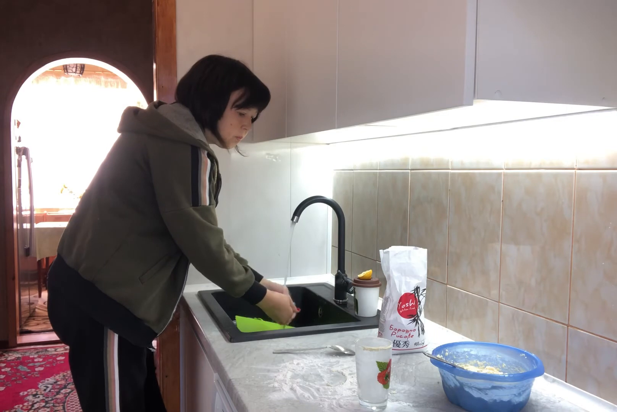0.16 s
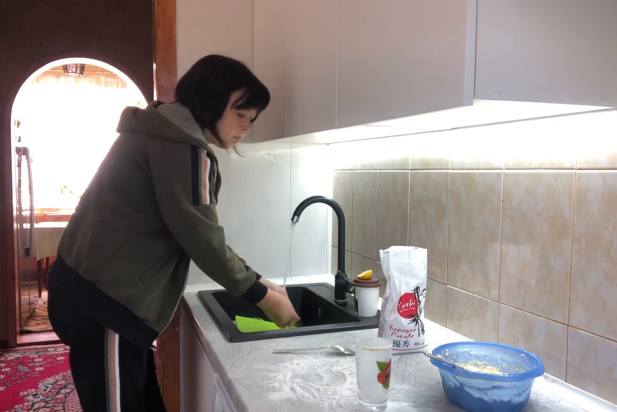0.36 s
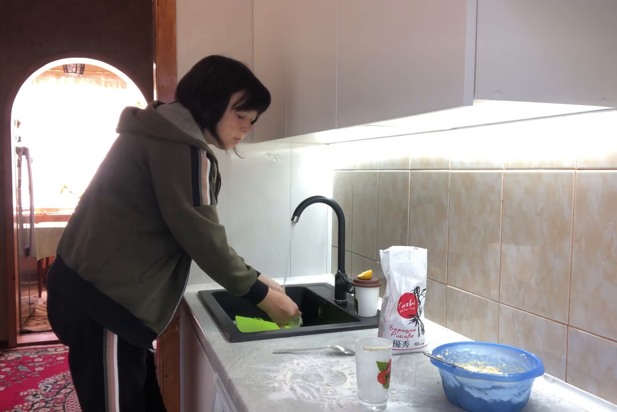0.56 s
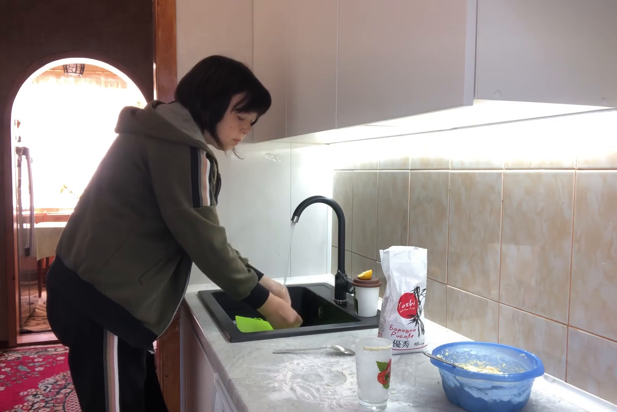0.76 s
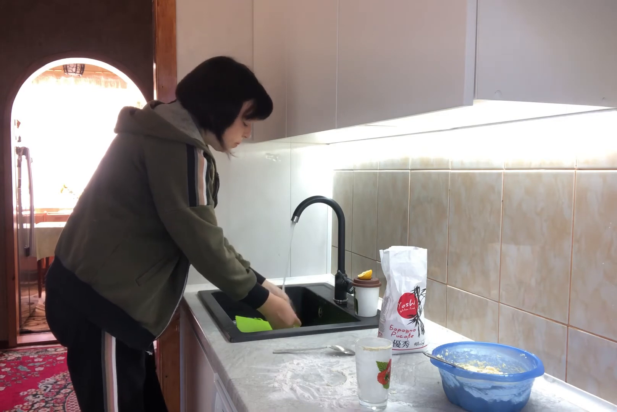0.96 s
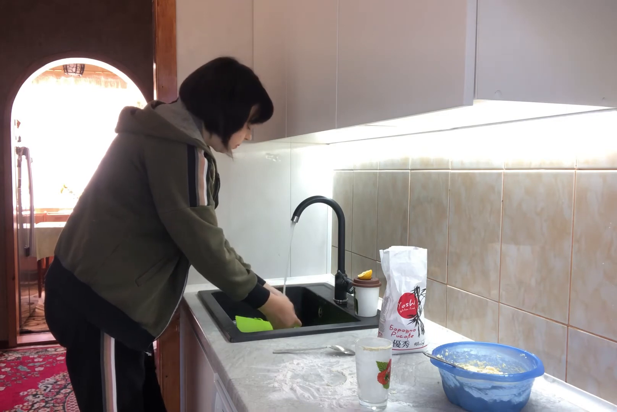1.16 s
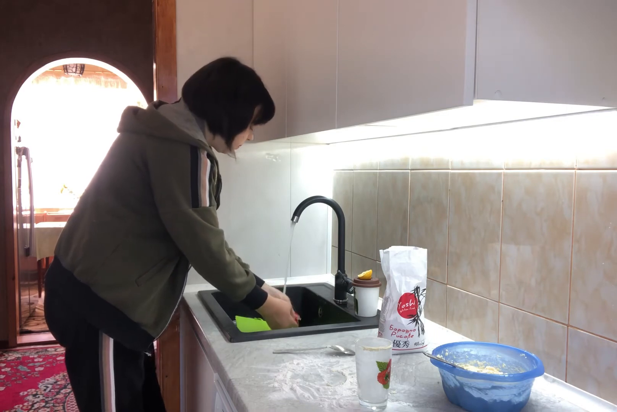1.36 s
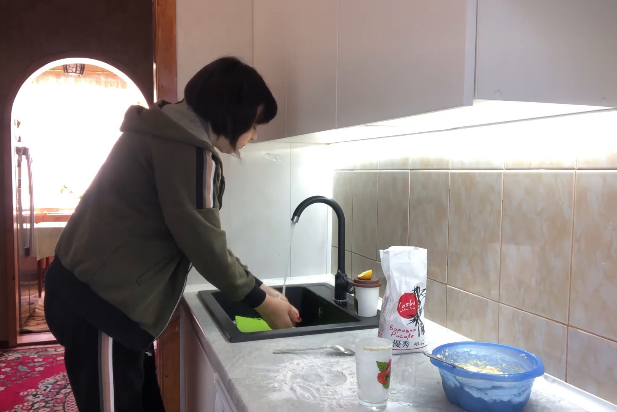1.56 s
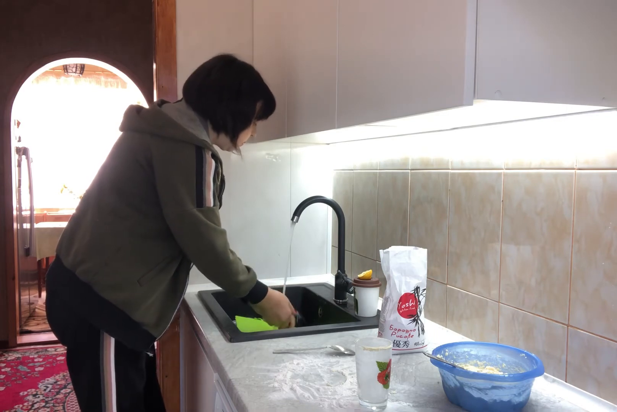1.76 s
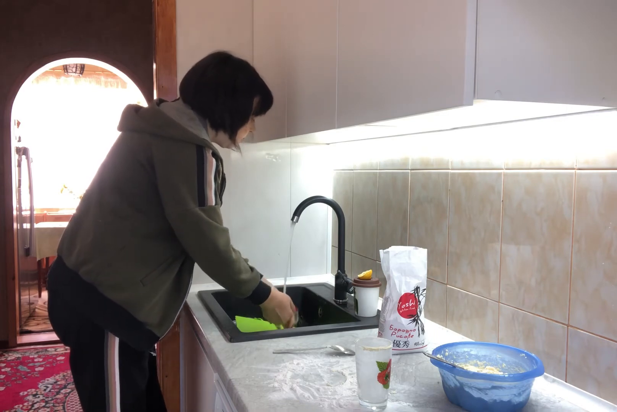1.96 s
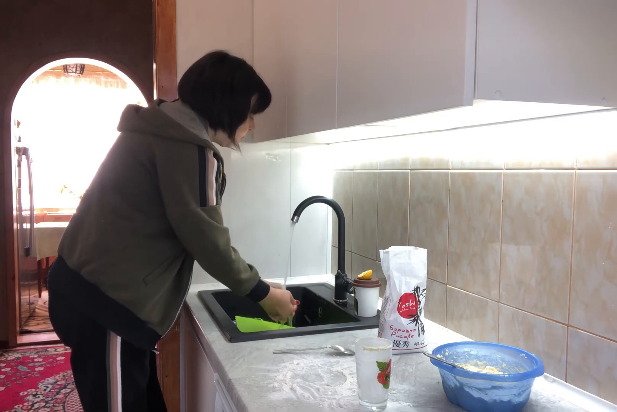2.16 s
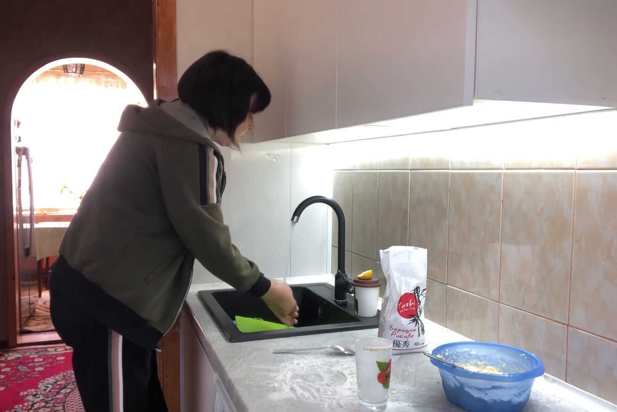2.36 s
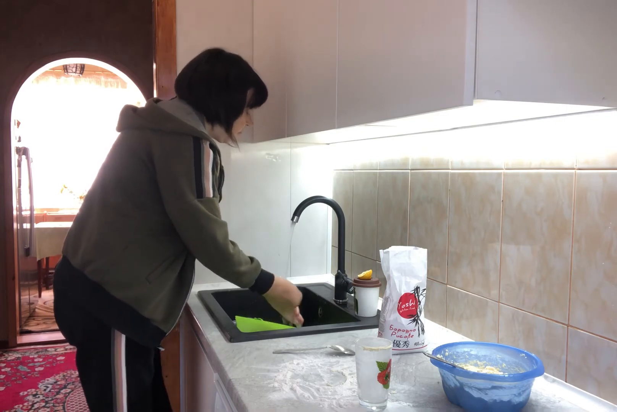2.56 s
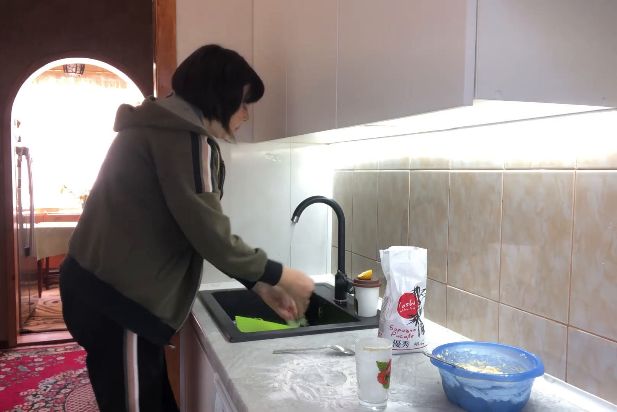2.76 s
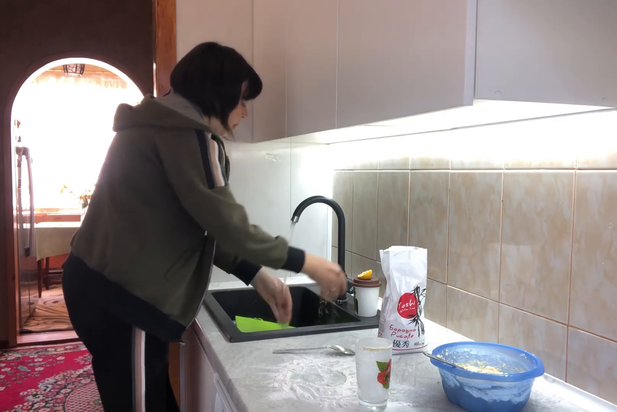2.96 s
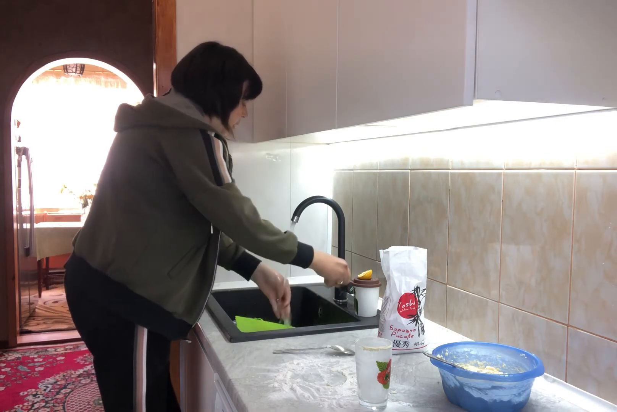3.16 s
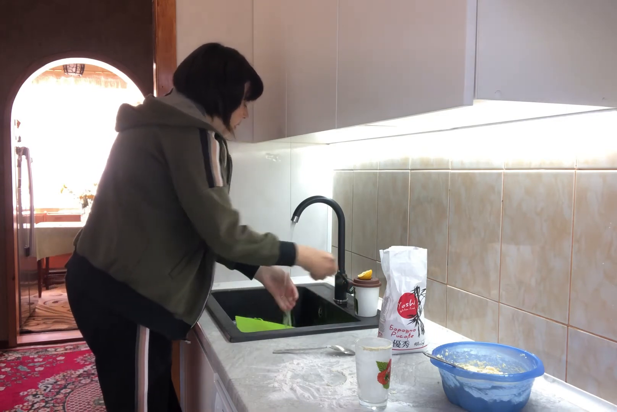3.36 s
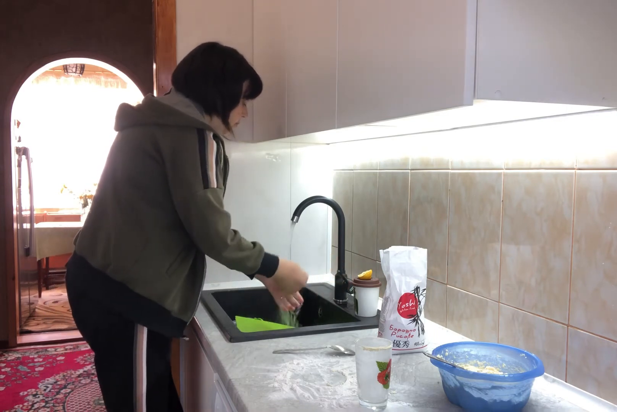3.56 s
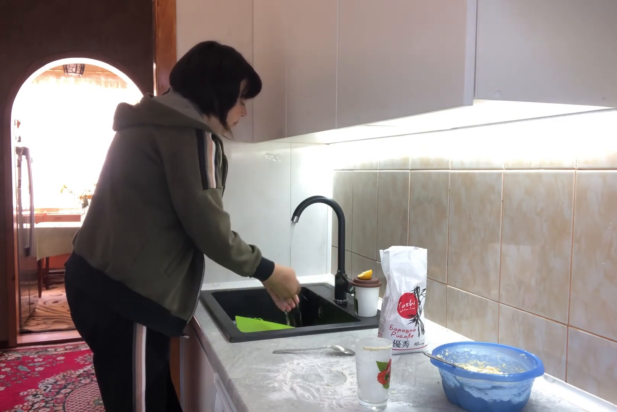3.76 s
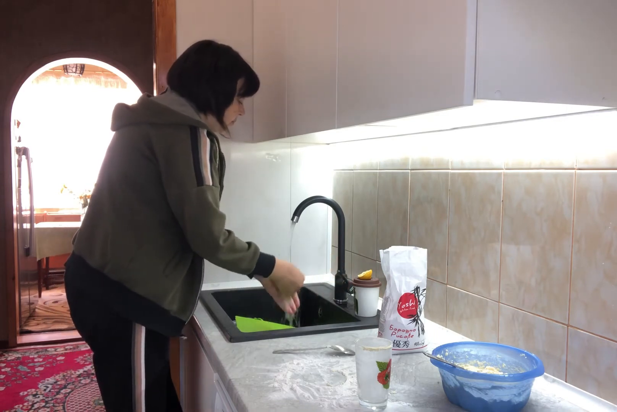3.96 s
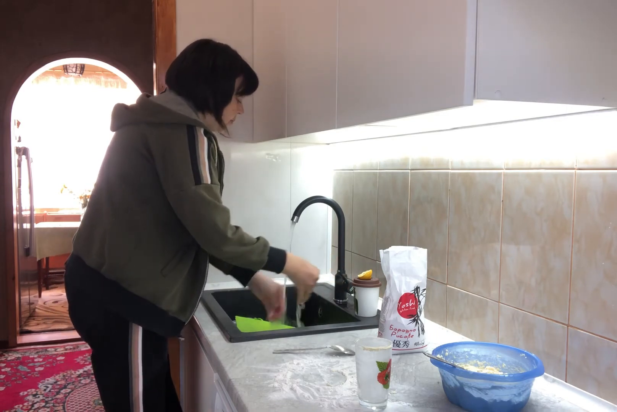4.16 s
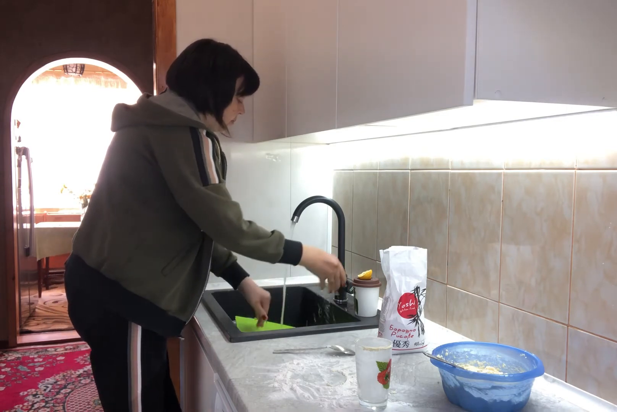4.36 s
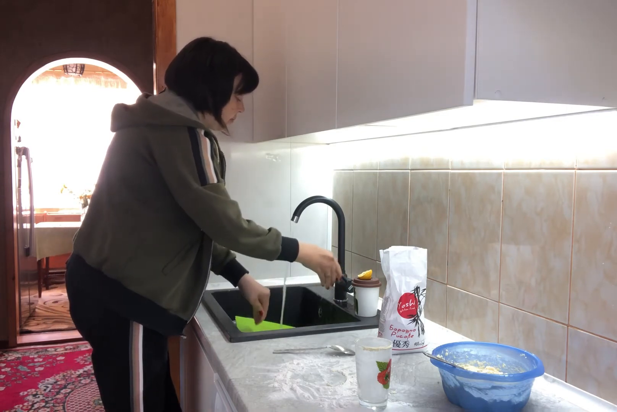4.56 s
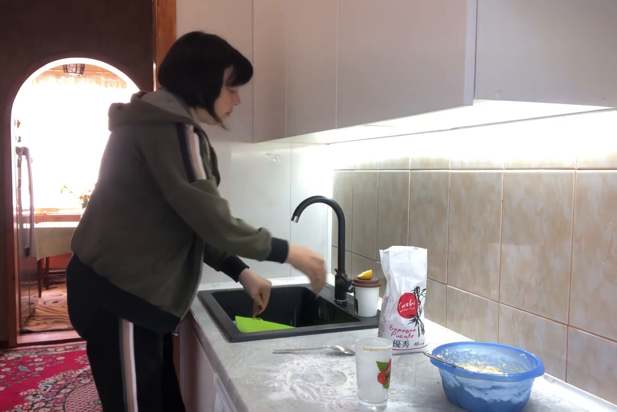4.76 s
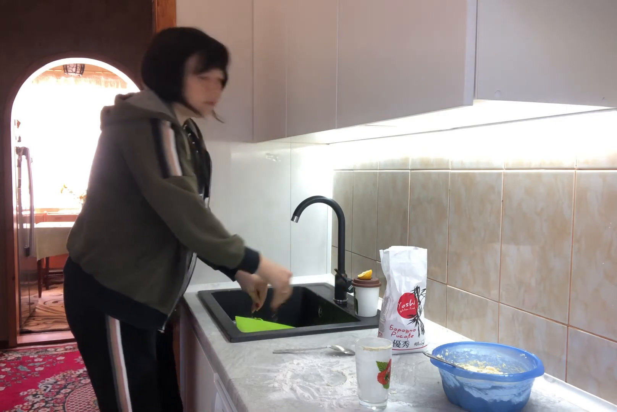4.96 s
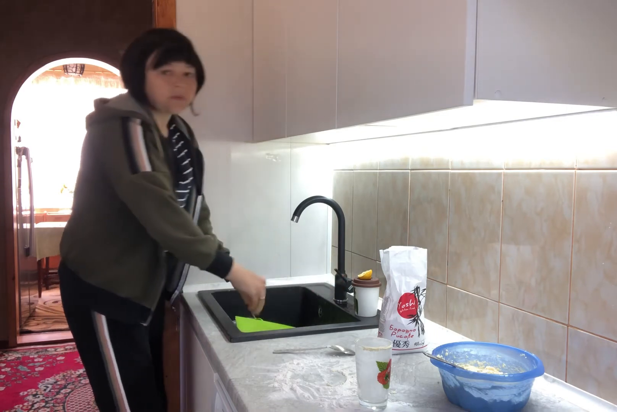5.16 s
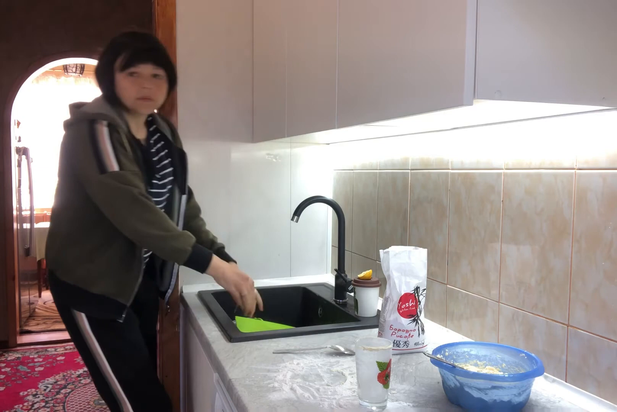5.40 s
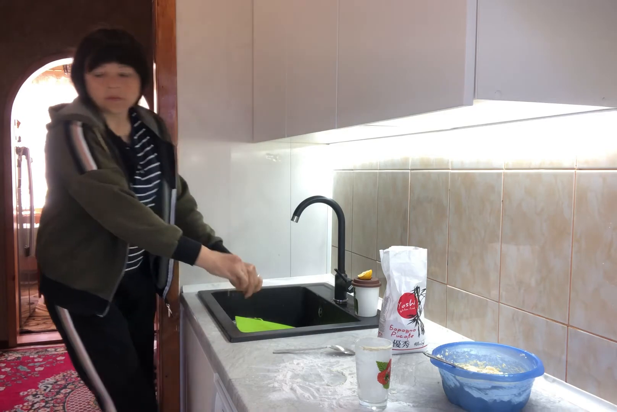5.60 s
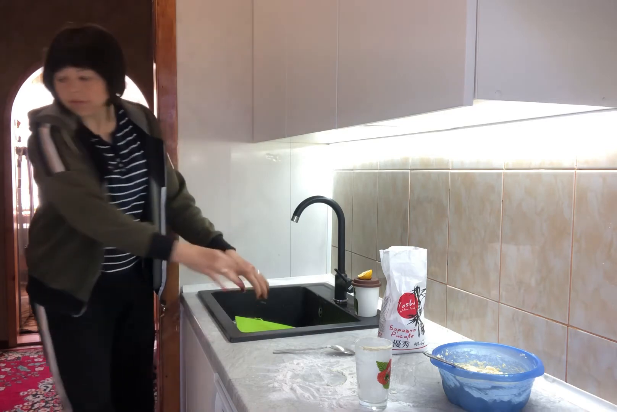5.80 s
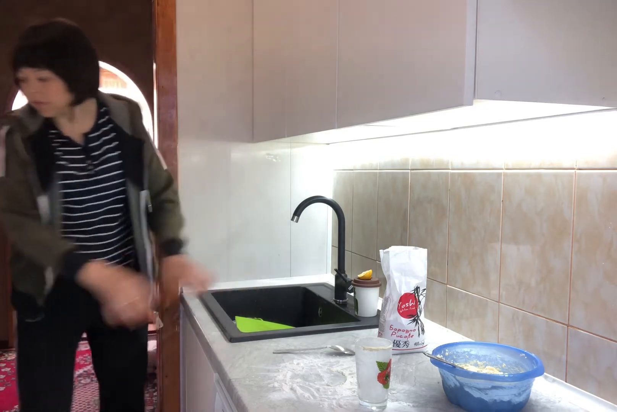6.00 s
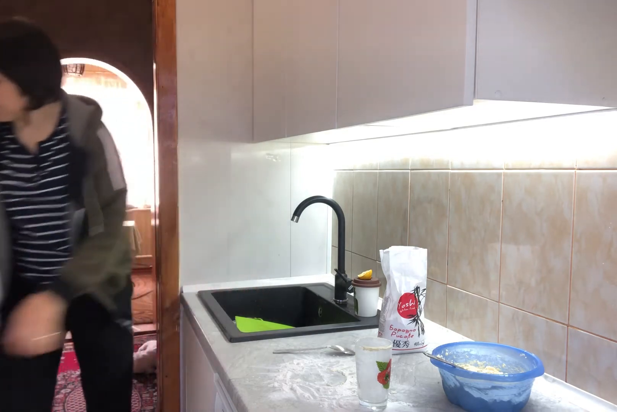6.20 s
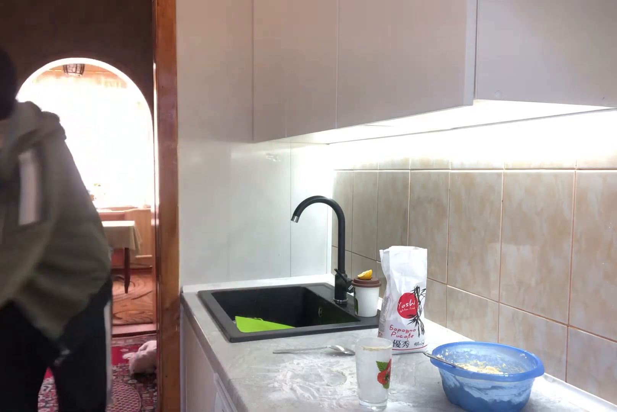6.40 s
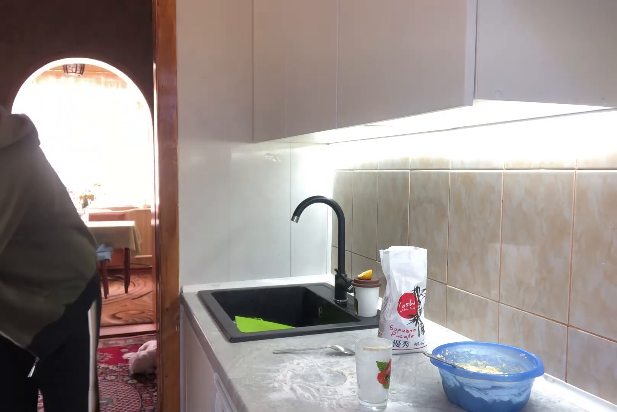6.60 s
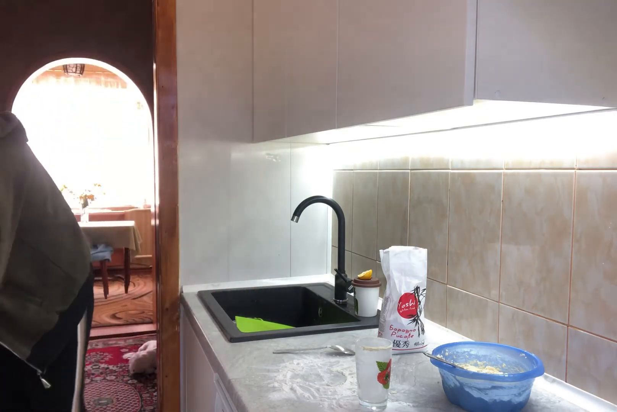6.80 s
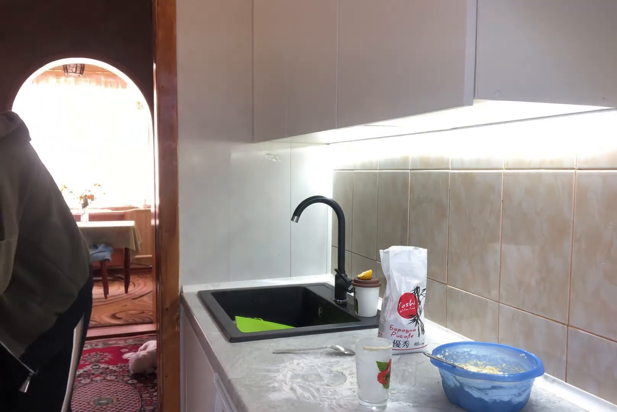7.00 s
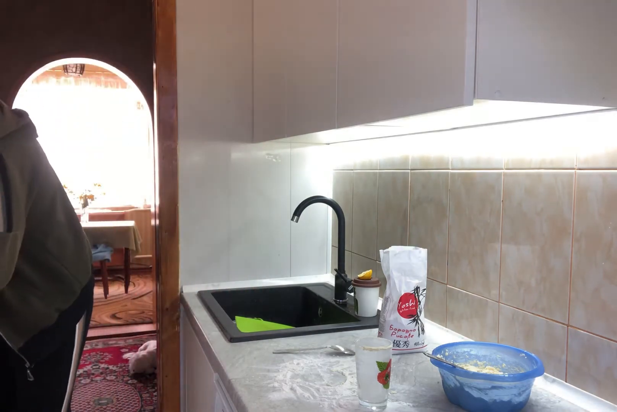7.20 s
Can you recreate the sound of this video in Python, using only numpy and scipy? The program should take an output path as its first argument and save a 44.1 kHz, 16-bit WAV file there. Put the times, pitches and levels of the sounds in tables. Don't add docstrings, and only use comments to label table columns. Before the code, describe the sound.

Hands rinse under a running tap, bright splashing and plopping; after the valve closes, small ticks, cloth rustle and soft thuds over quiet mains hum.

```python
import sys
import numpy as np
from scipy import signal
from scipy.fft import rfft, irfft
from scipy.io import wavfile
from scipy.ndimage import uniform_filter1d

SR = 44100
rng = np.random.default_rng(int(sys.argv[2]) if len(sys.argv) > 2 else 0)


def elevation(decibels):
    levels = np.asarray(decibels, float)
    return 10 ** (levels / 20)


def bounce(signal):
    frames = np.transpose(np.atleast_2d(signal))
    limited = np.clip(frames, -1, 1)
    pcm = np.round(limited * 32767).astype(np.int16)
    wavfile.write(sys.argv[1], SR, pcm)


N = 319284
TIME_S = np.arange(N) / SR


def evened(x):
    return x / np.sqrt(np.mean(x ** 2) + 1e-20)


def read(points, hz):
    f, value = np.transpose(points)
    return np.interp(np.log(hz + 1), np.log(f + 1), value)


def curves(rows):
    s, *columns = np.transpose(rows)
    return [np.interp(TIME_S, s, column) for column in columns]


def add(mix, s, sound):
    part = mix[round(s * SR):][:len(sound)]
    part += sound[:len(part)]


def swell(s, db, fade_s, rise_s=None):
    late_s = TIME_S - s
    rise_s = rise_s or 0.5 * fade_s
    return elevation(db - 20 * np.maximum(late_s / fade_s, -late_s / rise_s))


def held(s, end_s, edge_s):
    return np.clip(np.minimum(TIME_S - s, end_s - TIME_S) / edge_s + 0.5, 0, 1)


def dips(rows):
    shares = [share * held(s - length_s / 2, s + length_s / 2, length_s / 2) for s, length_s, share in rows]
    return np.clip(sum(shares), 0, 1)


def fall_db(s, db_per_s):
    return -db_per_s * np.maximum(TIME_S - s, 0)


def wander(size):
    return evened(uniform_filter1d(rng.standard_normal(N), size=size))


def coloured(x, points):
    hz = np.fft.rfftfreq(len(x), 1 / SR)
    return evened(irfft(rfft(x) * elevation(read(points, hz)), len(x)))


def hiss(points, patchy_db, flicker_db, size=256):
    frames, hz = 4 * N // size + 8, np.fft.rfftfreq(size, 1 / SR)
    a, b, patches = rng.standard_normal((frames, len(hz), 3)).T
    patches = uniform_filter1d(patches, size=3, axis=0)
    patches = evened(uniform_filter1d(patches, size=30, axis=1))
    flicker = evened(uniform_filter1d(rng.standard_normal(frames), size=12))
    level_db = read(points, hz)[:, None] + patchy_db * patches + flicker_db * flicker
    z = (a + 1j * b) * elevation(level_db)
    return evened(signal.istft(z, nperseg=size, noverlap=3 * size // 4)[1][:N])


def bubble(hz, t60_s, rise):
    t = np.arange(int(t60_s * SR) + 8) / SR
    ring = np.sin(2 * np.pi * hz * (t + rise * t ** 2 / t60_s))
    return ring * elevation(-60 * t / t60_s) * (1 - np.exp(-t / 0.0011))


def fizz(points, per_s, cycles, spread_db, count=24):
    out = np.zeros(N)
    for hz in np.geomspace(points[0][0], points[-1][0], count):
        size = 1. * (rng.random(N) < per_s / count / SR)
        strengths = elevation(spread_db * np.minimum(rng.exponential(1, N // count), 4))
        size[size > 0] = strengths[:int(size.sum())]
        grain = bubble(hz * rng.uniform(0.921, 1.03), cycles / hz, rise=0.17)
        out += signal.oaconvolve(size, grain * elevation(read(points, hz)) * hz)[:N]
    return evened(out)


def whistle(hz, width_hz, db, steady=0):
    r = np.exp(-np.pi * width_hz / SR)
    slow = rng.standard_normal(N) + 1j * rng.standard_normal(N)
    slow = signal.lfilter([1 - r], [1, -r], slow)
    slow = signal.lfilter([1 - r ** 3], [1, -r ** 3], slow)
    slow = slow / (abs(slow) + 1e-9) ** steady
    return elevation(db) * evened((slow * np.exp(2j * np.pi * hz * TIME_S)).real)


# time in seconds, strike in dB, spray relative to it in dB.
JET_FORCE = [(0, -42.5, -5.5), (.15, -43, -4), (.45, -45.5, -6.5), (.9, -45, -4), (1.45, -42.5, -5.5),
             (1.6, -43, -4.5), (1.95, -42.5, -3.5), (2.1, -43, -7.5), (2.8, -45, -4.5), (3.1, -44.5, -8.5),
             (3.45, -45, -6), (3.6, -41.5, -5), (3.8, -50, -0.5), (3.97, -43, -6.5), (4.13, -46.5, -7.5),
             (4.23, -43, -1), (4.49, -41.5, -0.5), (4.75, -45, 2.5)]


def strike():
    return elevation(curves(JET_FORCE)[0] + fall_db(JET_FORCE[-1][0], 228))


# centre in seconds, length in seconds, share muted 0-1.
HOLLOWS = [
    (.33, .06, .5),
    (.87, .2, .3),
    (1.05, .12, .5),
    (1.36, .06, .3),
    (1.47, .1, .6),
    (3.8, .2, .3),
]


def smothered():
    return dips(HOLLOWS)


# frequency in Hz, density in dB per Hz.
SPLASH_SPECTRUM = [(2300, -30), (2900, -5), (3400, -3.5), (5000, 1), (6330, -4), (7200, 0.5), (8000, -10),
                   (10000, -21)]
# frequency in Hz, density in dB per Hz.
SPRAY_SPECTRUM = [(4000, -15.5), (6500, -2.5), (8000, -3.5), (10000, -5.5), (12000, -6.5), (15700, -12)]
# centre in seconds, length in seconds, share muted 0-1.
FINGER_LULLS = [
    (0.103, 0.044, 0.2),
    (.33, 0.053, 0),
    (1.49, 0.082, 0.35),
    (2.012, 0.057, 0.45),
    (2.46, 0.083, 0.28),
    (3.132, 0.072, 0.3),
    (4.532, 0.048, 0.62),
    (4.582, 0.035, 0.66),
]
# time in seconds, peak in dB.
SPURTS = [(.105, -38), (.273, -40), (.69, -36), (.862, -47), (.932, -38), (1.036, -46), (1.374, -39),
          (1.566, -40), (1.735, -35), (1.812, -41), (1.926, -42), (1.959, -38), (2.129, -41), (2.377, -38),
          (2.522, -39), (2.599, -40), (2.697, -40), (2.864, -43), (2.915, -41), (3.031, -38), (3.061, -40),
          (3.249, -47), (3.547, -37), (3.973, -37)]


def jet():
    muted = dips(FINGER_LULLS)
    spray_db = curves(JET_FORCE)[1]
    splash = hiss(SPLASH_SPECTRUM, 1.3, 0.99)
    splash += elevation(-5.5) * fizz(SPLASH_SPECTRUM, 1500, 45, 3.8)
    splash += elevation(-14.5) * fizz(SPLASH_SPECTRUM, 400, 9.0, 3.0)
    lowpass = signal.butter(4, 3000, fs=SR, output="sos")
    splash = splash - smothered() * signal.sosfiltfilt(lowpass, splash)
    spray = hiss(SPRAY_SPECTRUM, 1.6, 1.2)
    spray += elevation(-14) * fizz(SPRAY_SPECTRUM, 3000, 38, 3.9)
    spray += elevation(-8.5) * fizz(SPRAY_SPECTRUM, 1200, 7.3, 3.0, count=10)
    spurts = sum(swell(s, db - 12, fade_s=0.035, rise_s=0.017) for s, db in SPURTS)
    both = elevation(-1) * (1 - muted) * splash + elevation(spray_db) * (1 - 0.34 * muted) * spray
    return strike() * both + spurts * spray


# frequency in Hz, density in dB per Hz.
PLOP_SPECTRUM = [(1700, -18), (2100, -1), (2700, 3.5), (3100, -4.5), (3700, -37)]
# time in seconds, level in dB, fade in seconds.
CAUGHT = [(.04, -44, 0.21), (.15, -51, 0.14), (.44, -46, 0.54), (.68, -54, 0.3), (1.52, -47, 0.16),
          (1.9, -52, 0.27), (2.15, -46, 0.33), (2.63, -44.5, 0.27), (2.91, -45, 0.19), (3.26, -45, 0.23),
          (3.6, -47, 0.11), (3.95, -49, .3), (4.3, -53, 0.25), (4.43, -48, 0.12), (4.66, -46, 0.11)]


def caught_water():
    plop = hiss(PLOP_SPECTRUM, 3.0, 0.39) + elevation(-2) * fizz(PLOP_SPECTRUM, 300, 57, 3.2)
    level = np.maximum(elevation(-9.5) * strike(), sum(swell(*row) for row in CAUGHT))
    return elevation(-7.5) * (1 - smothered()) * level * plop


# time in seconds, level in dB.
FLOW = [(0, 1), (.6, 0), (1.0, 0.5), (1.7, 0), (2.4, 0.5), (2.9, 2.5), (3.18, -0.5), (3.6, 1.5), (4.1, 1),
        (4.27, 4), (4.53, -1.5)]


def flow():
    return curves(FLOW)[0] + fall_db(FLOW[-1][0], 75)


# frequency in Hz, density in dB per Hz.
GURGLE_SPECTRUM = [(700, -27), (1000, -2.5), (1500, -2), (1900, 2), (2300, -24)]
# time in seconds, level in dB, fade in seconds.
CUPPED = [
    (.42, -51, 0.24),
    (.55, -50, 0.4),
    (1.55, -50.5, .2),
    (2.3, -49, 0.52),
    (2.46, -52.5, 0.5),
    (3.26, -58, .2),
    (3.92, -48.5, 0.36),
]


def cupped_hands():
    gurgle = hiss(GURGLE_SPECTRUM, 2.3, 0.45) + elevation(-3) * fizz(GURGLE_SPECTRUM, 300, 50, 2.0)
    steady = elevation(-53 + 0.22 * flow() + fall_db(4.3, 30))
    level = np.maximum(steady, sum(swell(*row) for row in CUPPED))
    return elevation(-4) * level * gurgle


# time in seconds, peak in dB, pitch in Hz.
PLOP_BUBBLES = [(0.0348, -28.5, 2660), (.09, -32.5, 2950), (.135, -31, 3170), (.1676, -28, 3800),
                (.263, -35.5, 2800), (.49, -29, 3350), (0.478, -35, 2720), (.6732, -28, 3300),
                (.8003, -33, 3860), (.84, -30, 3800), (.9697, -31, 3770), (1.015, -38, 3120),
                (1.1254, -33, 3500), (1.182, -32, 3130), (1.4057, -35, 3870), (1.8168, -35.5, 2900),
                (1.905, -31.5, 3080), (2.135, -39, 2300), (2.378, -30, 4050), (2.59, -32.5, 2440),
                (2.905, -31, 3250), (3.885, -40, 4020), (3.945, -33, 4120), (1.5938, -31, 4300),
                (1.6911, -30, 4300), (2.033, -31, 4400), (2.14, -28.5, 4300), (2.564, -33, 3140),
                (2.591, -30.5, 3500), (2.6237, -28, 3390), (2.6815, -31, 2490), (2.869, -30, 3010),
                (2.8993, -29.5, 2560), (2.914, -34, 2790), (2.935, -39, 2790), (2.965, -29.5, 2990),
                (3.173, -41, 2430), (3.25, -36, 2420), (3.61, -33, 3720), (4.3665, -26, 4570),
                (4.418, -27, 3600), (4.4743, -28, 4040), (4.5502, -30.5, 3430), (4.5999, -35, 4400),
                (4.655, -27, 3990),
                (1.286, -27, 6000), (1.351, -29, 4700), (2.145, -35.5, 4970), (2.7422, -32, 5200),
                (4.369, -30, 5500), (4.4175, -33, 4870), (4.4714, -29, 5060), (4.5526, -28, 5210),
                (4.598, -31, 4830)]


def plop_bubbles():
    out, plops, t = np.zeros(N), PLOP_BUBBLES, np.arange(4096) / SR
    for s, db, hz in plops:
        t60_s = 0.034 * np.sqrt(3800 / hz)
        add(out, s, elevation(db - 6) * bubble(hz, max(t60_s, 0.01), rise=0.013))
        shape = [(hz / 1.5, -30), (hz / 1.23, 0), (1.4 * hz, 0), (2.5 * hz, -25)]
        puff = coloured(rng.standard_normal(len(t)), shape)
        add(out, s, elevation(db - 8.5 - 60 * t / 0.026) * (1 - np.exp(-t / 0.0014)) * puff)
        for late, higher in rng.random((5, 2)):
            small = bubble(hz * (0.88 + 0.295 * higher), 0.6 * t60_s, rise=0.058)
            add(out, s + 0.035 * late ** 2, elevation(db - 11.5) * small)
    return out


# time in seconds, peak in dB, pitch in Hz.
LOW_BUBBLES = [(.164, -31, 2100), (.374, -34, 1044), (.374, -34, 1405), (.398, -35, 1076),
               (.435, -37, 1190), (.455, -33, 1720), (.498, -35, 1340), (.522, -38, 1650),
               (.535, -36, 1910), (.54, -41, 1390), (.57, -38, 1367), (.6, -37, 1520), (1.593, -40, 1040),
               (2.249, -28, 1514), (2.272, -38, 1470), (2.296, -31, 1830), (2.32, -39, 1760),
               (2.347, -33, 1440), (2.372, -35, 1890), (2.398, -38, 1950), (2.419, -43, 1900),
               (2.449, -27.5, 1940), (2.451, -37.5, 1050), (2.475, -34, 1810), (2.49, -36.5, 1490),
               (2.512, -35, 1560), (3.172, -33, 2190), (3.252, -32, 2000), (3.591, -29, 2210),
               (3.88, -32.5, 2180)]


def low_bubbles():
    out = np.zeros(N)
    for s, db, hz in LOW_BUBBLES:
        t60_s = 40.4 / hz
        add(out, s, elevation(db) * bubble(hz, max(t60_s, 0.01), rise=0.043))
        for late, higher in rng.random((3, 2)):
            small = bubble(hz * (0.86 + 0.34 * higher), t60_s, rise=0.075)
            add(out, s + 0.04 * late, elevation(db - 10) * small)
    return out


# time in seconds,
# peak in dB, pitch in Hz, t60 in seconds.
LONE_BUBBLES = [(.166, -34, 3980, .03), (.166, -35, 2510, .03), (.395, -43, 2520, .06), (.395, -41, 1800, .07),
                (.43, -40, 2470, .03), (.495, -42, 2690, 0.06), (.555, -38.5, 1350, 0.085), (.605, -46, 2450, .03),
                (.7, -41, 2430, 0.032), (2.63, -35, 3650, .04), (2.15, -40, 2250, 0.03), (3.615, -38, 3300, 0.046),
                (6.289, -39, 4300, .015), (6.289, -48, 2500, 0.013), (6.269, -42, 4400, .015),
                (4.212, -30, 7700, 0.022), (4.553, -38, 9800, .05), (4.626, -33, 9800, .045),
                (4.698, -34, 7900, 0.02), (5.734, -41, 1603, 0.05), (5.749, -42, 1590, 0.031)]


def lone_bubbles():
    out = np.zeros(N)
    for s, db, hz, t60_s in LONE_BUBBLES:
        add(out, s, elevation(db) * bubble(hz, max(t60_s, 0.01), rise=0.043))
    return out


# time in seconds, peak in dB, centre in Hz, t60 in seconds.
SLAPS = [(0.674, -41, 3900, 0.04), (2.034, -37, 3800, 0.13), (3.172, -47, 2600, .02),
         (3.252, -36, 2600, .03), (3.617, -33, 9000, 0.067), (3.928, -37.5, 11000, 0.066),
         (4.196, -47, 11000, .06), (4.443, -34, 12000, 0.054), (4.553, -29, 5500, 0.034),
         (4.624, -29, 8000, 0.033), (5.249, -34, 2800, 0.029), (6.134, -48, 2800, 0.046)]


def slaps():
    out, t = np.zeros(N), np.arange(4096) / SR
    for s, db, hz, t60_s in SLAPS:
        shape = [(hz / 4, -25), (hz / 1.5, -3), (hz, 0), (2 * hz, -5), (4 * hz, -16)]
        burst = coloured(rng.standard_normal(len(t)), shape)
        add(out, s, elevation(db - 1.5 - 60 * t / t60_s) * (1 - np.exp(-t / 0.00035)) * burst)
    return out


# time in seconds, peak in dB, centre in Hz, t60 in seconds.
TICKS = [(5.113, -38, 4230, 0.0044), (5.165, -40, 2230, 0.0077), (5.324, -31, 6800, 0.0034),
         (5.3245, -40, 5000, .003), (5.5435, -40, 3600, 0.014), (5.134, -39, 3900, .004),
         (5.141, -39, 3200, .004), (5.152, -40, 2110, .005), (5.19, -40, 1440, 0.0087),
         (5.197, -35, 2920, .006), (5.262, -37, 1500, 0.011), (5.275, -39, 2000, .01),
         (5.342, -39, 3000, .003), (5.725, -38, 7500, 0.0022), (7.091, -37, 9250, .002),
         (4.527, -34, 860, 0.012), (4.939, -38, 940, 0.009), (5.204, -33, 1650, 0.012),
         (5.204, -43, 825, 0.024), (5.248, -33.5, 1450, 0.013), (5.341, -30, 1000, 0.0027),
         (5.247, -36, 2880, 0.011), (5.994, -44, 756, 0.015), (6.134, -41, 1140, 0.0093),
         (6.529, -43, 1800, 0.0063)]
# time in seconds, peak in dB, centre in Hz.
CRACKLES = [(3.4, -25, 7600), (4.27, -29, 6200), (4.287, -30, 7000), (4.306, -32, 4100), (4.325, -25, 7800),
            (4.34, -28, 8000), (4.395, -31, 6500), (4.452, -24.5, 5100), (4.499, -29, 3500),
            (4.72, -29, 8500), (4.735, -37, 6200), (4.38, -29, 7000), (3.5, -36, 6500), (3.9, -28, 3800),
            (4.702, -26, 5600), (4.755, -34, 8000), (.866, -29, 6700), (.926, -31, 6000), (2.4, -30, 3500),
            (1.6, -34, 4800), (1.349, -35, 9500), (1.716, -32, 9500), (2.1, -33, 9000), (1.7, -33, 9500),
            (2.372, -35, 9500), (6.8, -38, 5300), (7.1, -41, 7500), (6.272, -35, 7600), (6.291, -38, 6900),
            (6.323, -49, 2800)]


def ticks():
    out, t = np.zeros(N), np.arange(4096) / SR
    snaps = [(s, db, hz, 20 / hz) for s, db, hz in CRACKLES]
    for s, db, hz, t60_s in TICKS + snaps:
        add(out, s, -elevation(db + 1.5 - 60 * t / t60_s) * np.sin(2 * np.pi * hz * t))
    return out


# frequency in Hz, width in Hz, level in dB.
SPOUT_BASIN_MODES = [(7011, 45, -9), (7125, 80, -5.5), (7245, 60, -8), (6689, 45, -12), (5829, 32, -12),
                     (5447, 20, -12), (345, 70, -14), (4719, 16, -13), (3472, 70, -14.5), (3130, 60, -15),
                     (2468, 27, -15), (1720, 45, -16), (1486, 22, -14)]
# start in seconds, length in seconds, level in dB.
SINGS = [(.02, .06, -52), (.11, .07, -52), (.2, .14, -49), (.372, .058, -49), (.46, .03, -52),
         (.546, .046, -49), (.6, .05, -50), (.94, .045, -49), (.985, .124, -48), (1.108, .03, -50),
         (1.158, .075, -49), (1.314, .07, -51), (1.4, .09, -49.5), (1.51, .08, -48.5), (1.599, .06, -49.5),
         (1.679, .06, -50), (1.77, .1, -49), (1.881, .07, -48.5), (1.986, .072, -50), (2.078, .126, -48.5),
         (2.24, .07, -50), (2.335, .08, -48.5), (2.49, .1, -49), (2.643, .07, -51), (2.757, .052, -50),
         (2.827, .034, -51), (2.878, .076, -45.5), (3.0, .035, -50), (3.09, .05, -52), (3.32, .03, -53),
         (3.385, .082, -50), (3.489, .05, -51), (3.555, .16, -46), (3.727, .075, -46), (3.9, .056, -51),
         (4.042, .045, -46), (4.191, .034, -51), (4.237, .082, -50), (4.329, .04, -49), (4.373, .04, -50)]


def spout_whistle():
    level_db = -51 + 0.32 * flow() + fall_db(4.33, 87) + 0.9 * wander(5000)
    spells = sum(elevation(db + 2.5) * held(s, s + length_s, edge_s=0.012) for s, length_s, db in SINGS)
    modes = elevation(level_db + 0.5) * sum(whistle(*mode) for mode in SPOUT_BASIN_MODES)
    main = whistle(6545, width_hz=22, db=0, steady=0.65)
    return modes + np.maximum(spells, elevation(level_db - 7)) * main


# start in seconds, end in seconds, level in dB.
LOW_SPELLS = [
    (3.6, 3.95, -65),
    (3.72, 3.95, -65),
    (3.844, 3.95, -67),
    (3.95, 4.098, -74),
]


def low_whistle():
    faint = elevation(-61 + fall_db(4.33, 87))
    spells = sum(elevation(db) * held(s, end_s, edge_s=0.03) for s, end_s, db in LOW_SPELLS)
    return (faint + spells) * whistle(3841, width_hz=2.5, db=0, steady=0.97)


# frequency in Hz, density in dB per Hz.
RUMBLE_SPECTRUM = [(110, -20), (170, -3), (300, 0.5), (550, -3), (900, -2.5), (1300, -91)]
# time in seconds, level in dB, fade in seconds.
PIPE_SHUDDERS = [
    (2.68, -68, 0.2),
    (3.55, -57.5, 0.3),
    (4.75, -50, 0.23),
]


def pipe_rumble():
    shake = elevation(-50.5 + flow()) + sum(swell(*row) for row in PIPE_SHUDDERS)
    return elevation(-2.5) * shake * hiss(RUMBLE_SPECTRUM, 0.89, 1.0, size=1024)


# frequency in Hz, density in dB per Hz.
RUB_LOW = [(400, -0.5), (750, -1), (1500, -1), (2500, -3.5), (3800, -1), (5500, -17), (7000, -40)]
# frequency in Hz, density in dB per Hz.
RUB_HIGH = [(3000, -15), (4500, -9), (7000, 0), (11000, -5), (16000, -11)]
# time in seconds, level in dB, fade in seconds, rise in seconds, bright part in dB.
RUSTLES = [(5.02, -57.5, 0.12, 0.42, -2), (5.14, -58, 0.17, 0.04, 8.5), (5.17, -60, .1, 0.041, 4),
           (5.2, -53.5, 0.11, 0.1, 5.5), (5.25, -56, 0.3, 0.048, 5), (5.37, -66, 0.082, 0.082, -35),
           (5.99, -54.5, 0.08, 0.033, -10), (6.14, -56, 0.13, 0.022, -25), (6.27, -55, 0.14, 0.13, 9),
           (6.32, -62, 0.21, 0.1, -4), (6.52, -66, 0.12, 0.022, 0)]


def rustles():
    dull = hiss(RUB_LOW, 1.3, 1.8) + elevation(-5) * fizz(RUB_LOW, 1500, 8, 2.5)
    bright = hiss(RUB_HIGH, 1.3, 1.6) + elevation(-5) * fizz(RUB_HIGH, 1500, 5, 2.5, count=10)
    out = np.zeros(N)
    for *stroke, bright_db in RUSTLES:
        out += swell(*stroke) * (dull + elevation(bright_db - 6) * bright)
    return out


# time in seconds, peak in dB, main mode in Hz, upper modes in dB, t60 in seconds.
KNOCKS = [(2.14, -47, 267, -7, 0.13), (3.43, -49.5, 400, -10, .1), (3.57, -48, 398, -12, 0.092),
          (3.87, -49.5, 348, -15, .15), (4.24, -45, 300, 1, 0.066), (4.529, -45, 198, -12, 0.13),
          (4.541, -51.5, 105.3, -4, 0.25), (4.94, -52, 400, -8, 0.04), (4.987, -36, 345, -18, 0.049),
          (4.98, -49, 300, -2, 0.034), (5.028, -47, 300, -12, .04), (5.039, -48, 230, -6, .03),
          (5.049, -44, 240, -6, 0.033), (5.218, -47.5, 277, -18, 0.074), (5.351, -47, 286, -13, 0.09),
          (5.992, -36, 497, -9, 0.025), (5.991, -43, 283, -8, .03), (6.011, -41, 255, -8, 0.049),
          (6.133, -44.5, 620, 1, 0.04), (6.146, -49, 776, -10, 0.035), (6.006, -46, 75, -15, .04),
          (6.15, -49, 198, -13, 0.088)]
# ratio to main mode, level in dB.
KNOCK_MODES = [(1, 3), (0.535, -13), (1.202, 0.5), (1.356, 0), (2.6, -6)]


def knocks():
    out, t = np.zeros(N), np.arange(SR // 3) / SR
    for s, db, hz, upper_db, t60_s in KNOCKS:
        for ratio, mode_db in KNOCK_MODES:
            level_db = db + 5.5 + mode_db + upper_db * (ratio > 1) - 60 * t * np.sqrt(ratio) / t60_s
            add(out, s, elevation(level_db) * np.sin(2 * np.pi * hz * ratio * t) * (1 - np.exp(-t / 0.0023)))
    return out


# frequency in Hz, rms level in dB.
HUM = [(100.2, -50.5), (200.4, -70)]
# frequency in Hz, density in dB per Hz.
FLOOR_SPECTRUM = [(25, -72), (72, -22), (160, -16), (440, -19), (730, -23.5), (2100, -26.5), (6370, -27),
                  (16000, -37)]


def background():
    waver_db = 0.97 * wander(6000)
    hum = sum(np.sqrt(2) * elevation(db + waver_db) * np.sin(2 * np.pi * hz * TIME_S) for hz, db in HUM)
    panels = whistle(98, width_hz=28, db=-60)
    return hum + panels + elevation(-54) * hiss(FLOOR_SPECTRUM, 0.38, 0.99, size=2048)


# centre in seconds, low edge in Hz, high edge in Hz, level in dB.
STRAY_PUFFS = [
    (.334, 5600, 7700, -47),
    (.542, 11000, 14500, -60),
    (.734, 5600, 8400, -48),
    (1.936, 13800, 15300, -60),
    (4.03, 9000, 12500, -56),
]


def stray_puffs():
    length_s = 0.03
    out, size = np.zeros(N), round(length_s * SR)
    for s, low_hz, high_hz, db in STRAY_PUFFS:
        shape = [(low_hz - 1, -99), (low_hz, 0), (high_hz, 0), (high_hz + 1, -99)]
        puff = coloured(rng.standard_normal(size), shape)
        add(out, s - length_s / 2, elevation(db) * np.sqrt(np.hanning(size)) * puff)
    return np.array([out, -out])


# delay in seconds, level in dB.
ECHOES = [(.0019, -39), (.0043, -17), (.0078, -12.5), (0.013, -22)]


def with_echoes(near):
    out = near.copy()
    for s, db in ECHOES:
        add(out, s, elevation(db) * near)
    return out


# frequency in Hz, t60 in seconds.
ROOM = [(200, 0.27), (1000, 0.22), (4000, 0.21), (12000, 0.06)]


def kitchen(x):
    taps = np.zeros(SR // 2)
    at = np.arange(200, SR // 2 - 20, 20)
    taps[at + rng.integers(0, 20, len(at))] = rng.choice([-1., 1.], len(at))
    hz, t, z = signal.stft(taps, SR, nperseg=256)
    tail = signal.istft(z * elevation(-60 * t / read(ROOM, hz)[:, None]), SR, nperseg=256)[1]
    return signal.fftconvolve(x, tail / np.linalg.norm(tail))[:N]


def scene():
    water = jet() + caught_water() + cupped_hands() + rustles()
    valve = spout_whistle() + low_whistle() + pipe_rumble()
    thuds = knocks()
    near = plop_bubbles() + low_bubbles() + lone_bubbles() + slaps() + ticks() + thuds
    tail = elevation(-7.5) * kitchen(near - 0.4 * thuds)
    mono = with_echoes(near) + tail + water + elevation(-11) * kitchen(water) + valve + background()
    return np.array([mono, mono])


def low_pass(x):
    return signal.sosfilt(signal.butter(12, 16130, fs=SR, output="sos"), x)


def record(dry):
    lowpass = signal.firwin(511, 15750, window=("kaiser", 9), fs=SR)
    limited = signal.oaconvolve(dry, lowpass[None], "same")
    return low_pass(limited + stray_puffs())


dry = scene()
out = record(dry)
bounce(out)
```